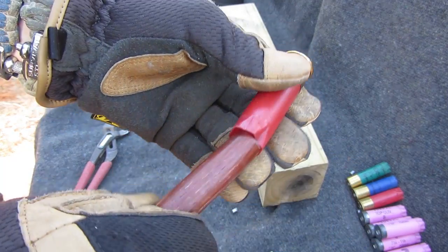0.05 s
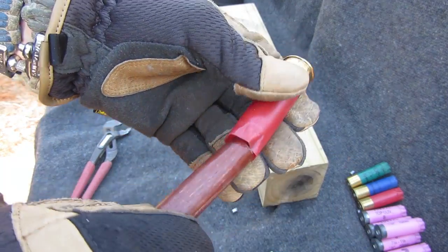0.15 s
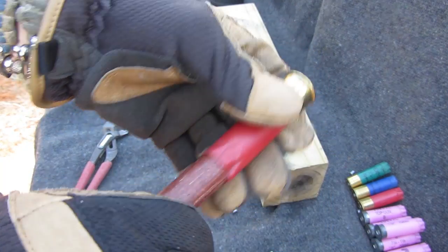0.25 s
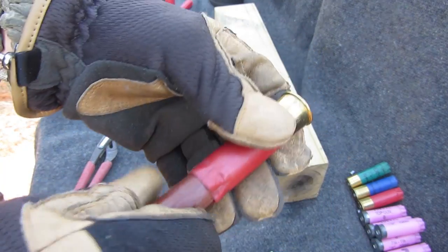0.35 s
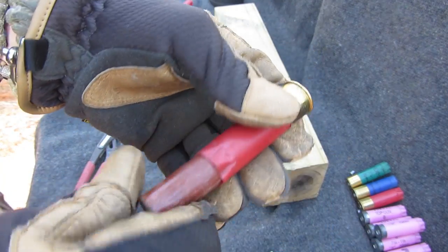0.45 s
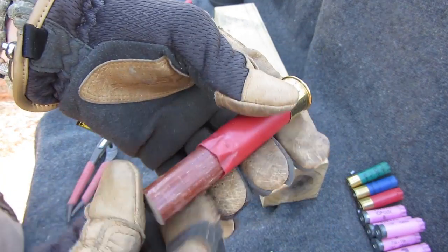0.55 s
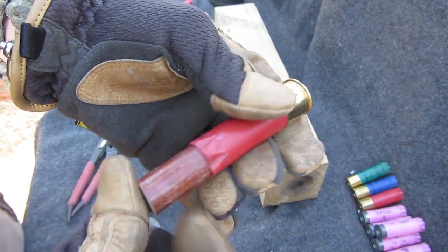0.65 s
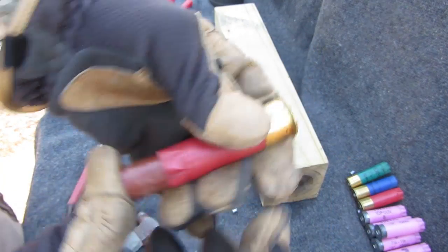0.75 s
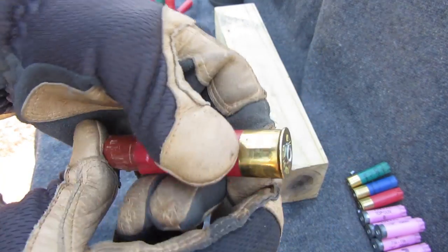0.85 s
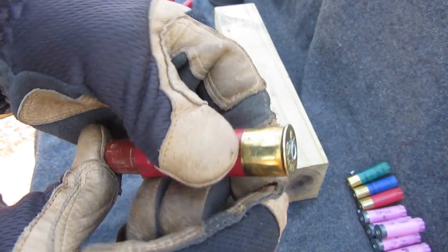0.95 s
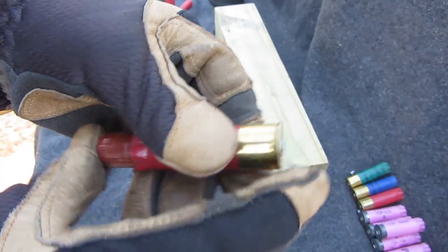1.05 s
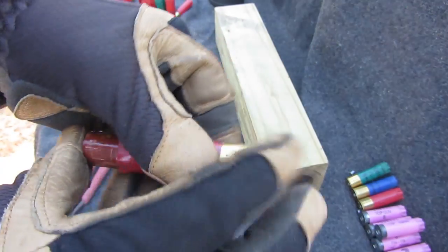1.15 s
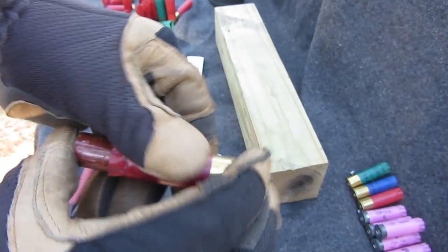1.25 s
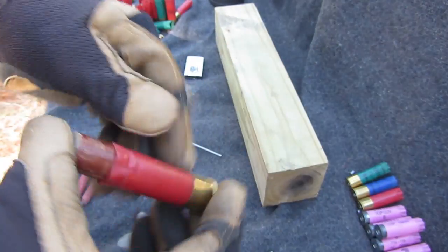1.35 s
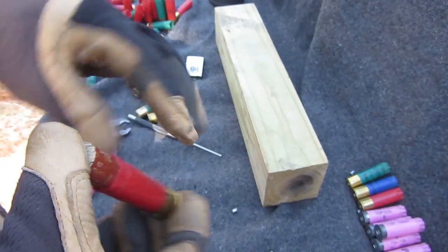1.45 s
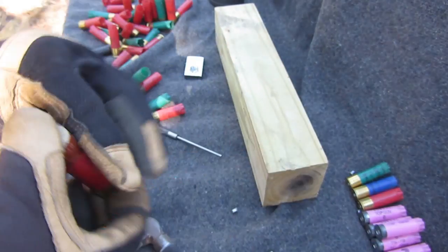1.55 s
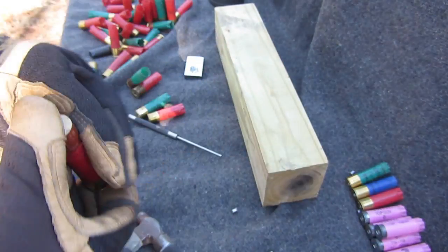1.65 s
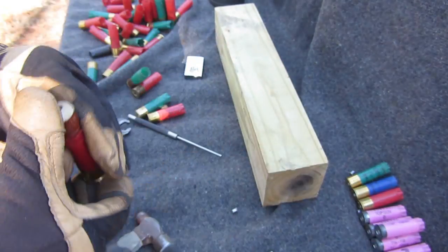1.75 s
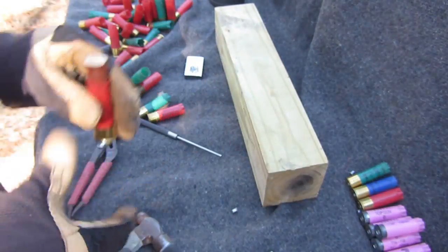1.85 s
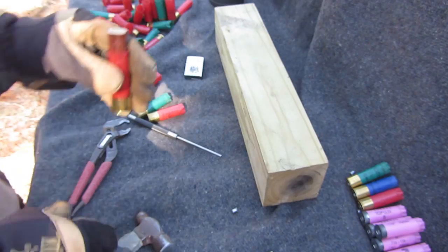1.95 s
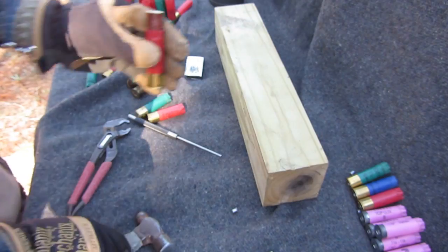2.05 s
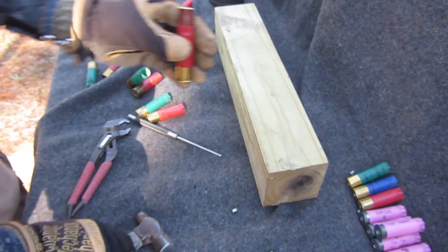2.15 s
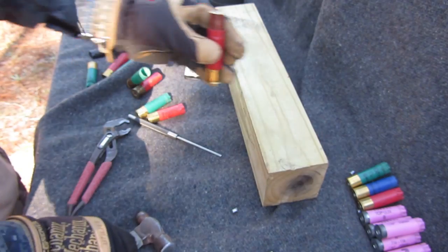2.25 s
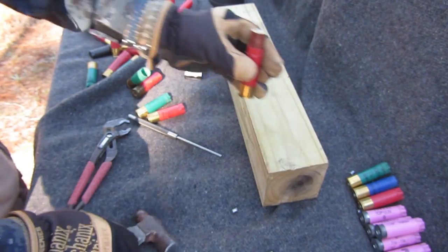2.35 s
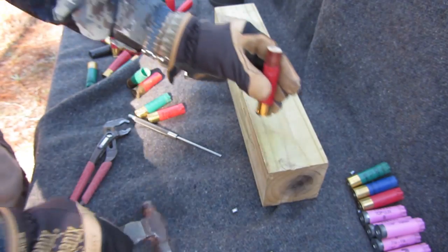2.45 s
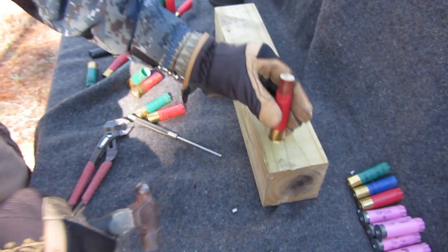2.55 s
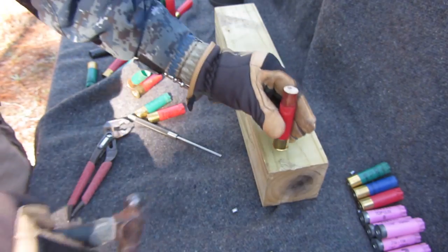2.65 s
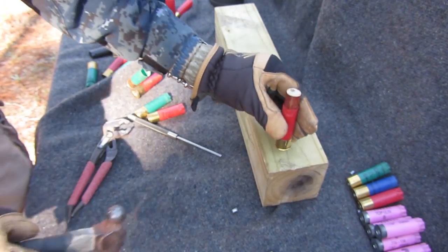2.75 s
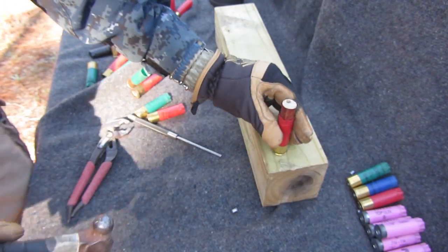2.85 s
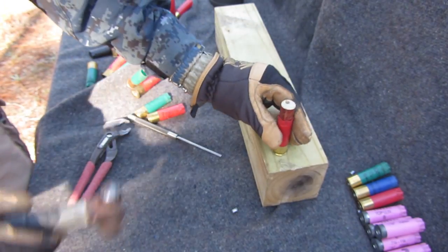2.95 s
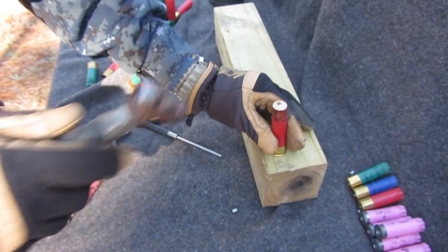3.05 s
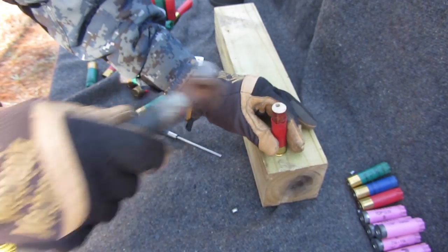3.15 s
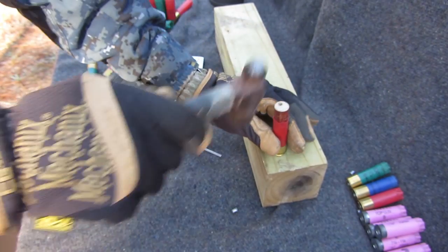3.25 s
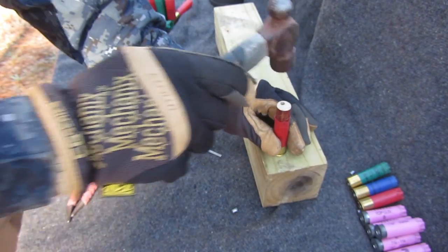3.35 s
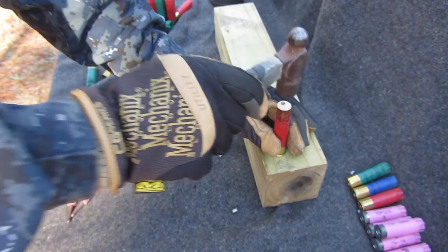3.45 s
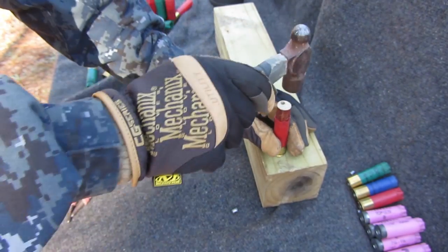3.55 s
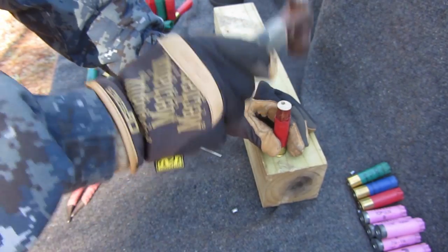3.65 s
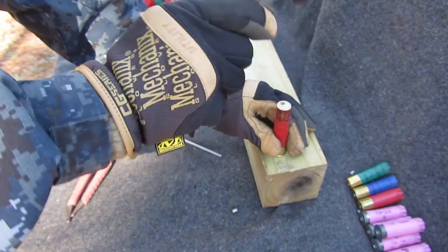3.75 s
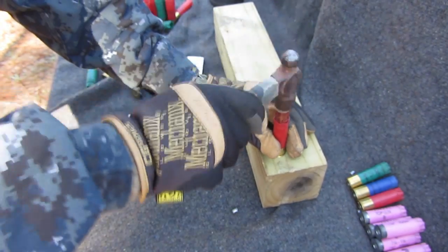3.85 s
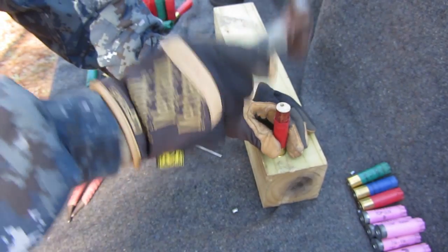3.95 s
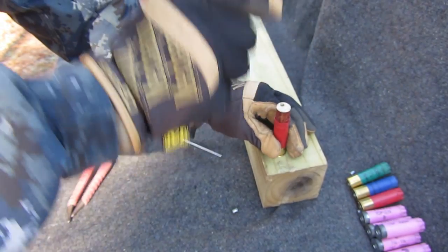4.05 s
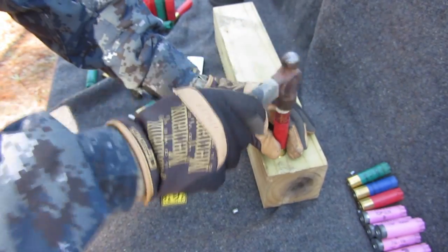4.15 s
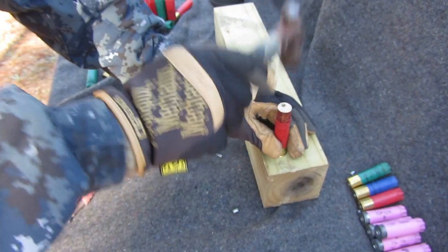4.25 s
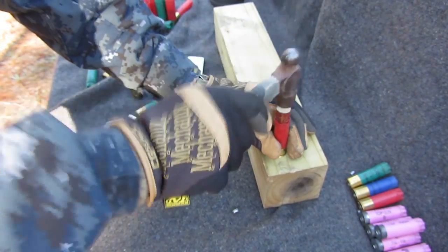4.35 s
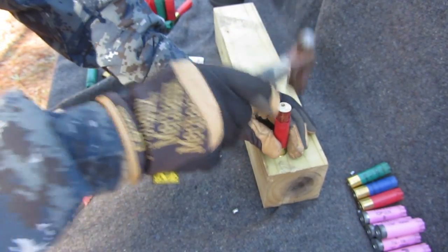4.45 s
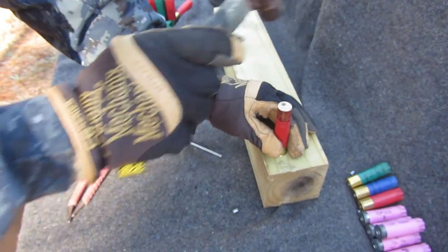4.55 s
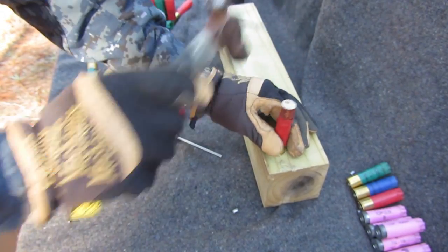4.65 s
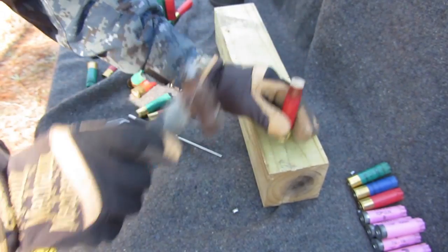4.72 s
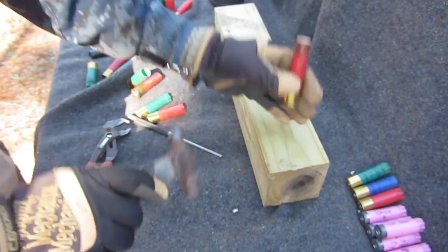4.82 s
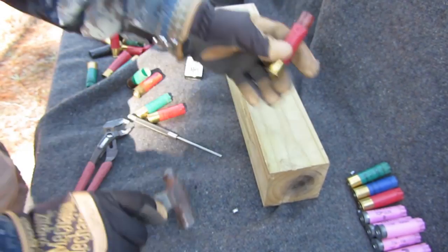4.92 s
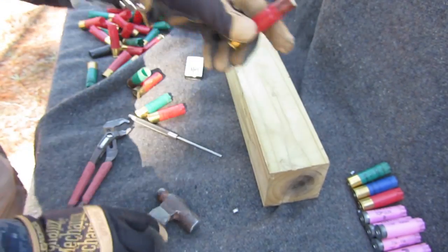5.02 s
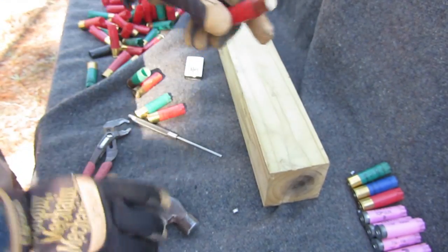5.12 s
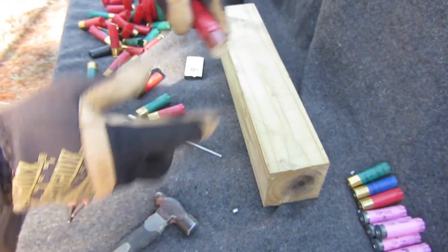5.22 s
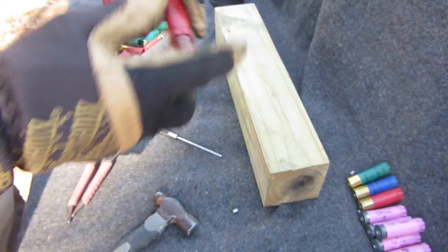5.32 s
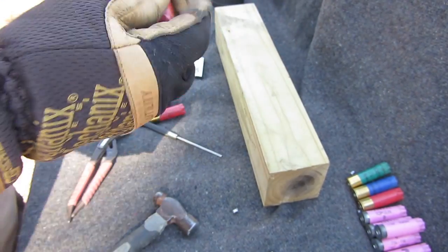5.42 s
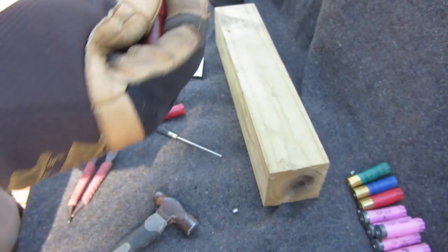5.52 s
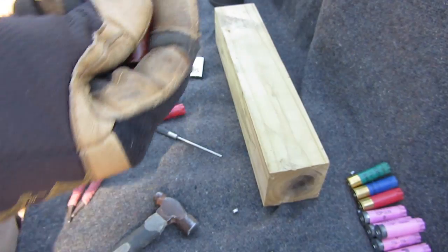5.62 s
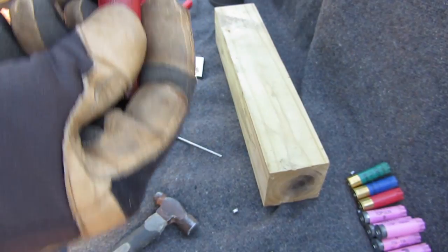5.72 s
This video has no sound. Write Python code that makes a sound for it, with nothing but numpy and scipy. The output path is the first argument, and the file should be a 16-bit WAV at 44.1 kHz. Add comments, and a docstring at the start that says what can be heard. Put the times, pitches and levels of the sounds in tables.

```python
"""Hammering a shell on a wooden block

Outdoors, at a blanket-covered deck, gloved hands work a wooden stick in an empty plastic shotgun shell. It clicks
home with damped air-column modes and pulses, scrapes back as stick-slip noise with a falling tone, and pops out.
The shell is stood on a wooden block and hammered three times: coloured noise cracks, modes ring in block and deck,
the block hops and loose things rattle. The hammer drops on the blanket as softer deck modes and a late rattle.
Gloves and sleeves rustle throughout as filtered noise, over faint outdoor air at the stereo microphone."""
import sys
import numpy as np
from scipy import signal
from scipy.fft import rfft, irfft
from scipy.io import wavfile

SR = 44100
rng = np.random.default_rng(int(sys.argv[2]) if len(sys.argv) > 2 else 0)


def transcribe(signal):
    """Save signal, clipped to [-1, 1], as a 16-bit WAV file at the path in sys.argv[1]."""
    frames = np.atleast_2d(signal).T
    limited = np.clip(frames, -1, 1)
    pcm = np.round(limited * 32767).astype(np.int16)
    wavfile.write(sys.argv[1], SR, pcm)


N = 254898
TIME = np.arange(N) / SR
AGE = TIME[:SR]  # one second after a contact


def undb(db):
    """Decibels to gain."""
    return 10 ** (np.asarray(db) / 20)


def curves(rows):
    """Every column of a timed table, joined by straight lines."""
    s, *columns = np.transpose(rows)
    return [np.interp(TIME, s, column) for column in columns]


def unit(x):
    """Scale to rms 1."""
    return x / np.sqrt(np.mean(x ** 2))


def colour(x, points):
    """Filter by a spectrum of (f/Hz, level/dB) points, joined on a log frequency axis; rms 1."""
    hz, db = np.transpose(points)
    f = np.maximum(np.fft.rfftfreq(x.shape[-1], 1 / SR), 1)
    gain = undb(np.interp(np.log(f), np.log(hz), db))
    return unit(irfft(rfft(x) * gain, x.shape[-1]))


def band(x, lo_hz, hi_hz, order=2):
    """Band-pass."""
    edges = [lo_hz, min(hi_hz, SR / 2 - 1000)]
    return signal.sosfilt(signal.butter(order, edges, "band", fs=SR, output="sos"), x)


def walk(rate):
    """Random curve with a spread near 1, through `rate` random points per second."""
    steps = rng.standard_normal(4096)
    return np.interp(TIME * rate, np.arange(len(steps)), steps)


def fade(t60):
    """Free decay by 60 dB in t60 seconds."""
    return np.exp(-np.log(1000) * AGE / t60)


def ring(modes, contact_s):
    """Modes (f/Hz, level/dB, t60/s) swell during contact and die away; little radiates below the first."""
    modal_sum = sum(undb(db) * np.sin(2 * np.pi * hz * AGE) * fade(t60) for hz, db, t60 in modes)
    struck = modal_sum * (1 - np.exp(-AGE / contact_s))
    return signal.sosfilt(signal.butter(2, 0.89 * modes[0][0], "high", fs=SR, output="sos"), struck)


def burst(points, t60):
    """A short crack of coloured noise."""
    return colour(rng.standard_normal(SR), points) * fade(t60)


def snap(s, points):
    """A single pressure pulse at time s with a spectrum of (f/Hz, level/dB) points; peak 1."""
    pulse = colour(signal.unit_impulse(N, int(s * SR)), points)
    return pulse / np.abs(pulse).max()


def spread(pair, width):
    """Two unrelated signals as mid and side."""
    return (pair[0] + width * np.array([[1], [-1]]) * pair[1]) / np.hypot(1, width)


def place(x, pan_db, lag=0):
    """Stereo place: level difference (left minus right) and the samples by which the left side lags."""
    left, right = np.broadcast_to(x, (2, N))
    delayed_left = np.interp(np.arange(N) - lag, np.arange(N), left)
    return np.array([delayed_left * undb(pan_db / 2), right * undb(-pan_db / 2)])


def add(track, s, x):
    """Mix a sound in at time s."""
    i = max(int(s * SR), 0)
    track[..., i:i + x.shape[-1]] += x[..., :N - i]


# spectrum of the open air around the deck: (f/Hz, level/dB)
AIR_SPECTRUM = [(25, -24), (50, -9.5), (80, 0), (130, -0.5), (250, -4.5), (500, -6.5), (900, -10.5),
                (1600, -19), (4000, -26.5), (16000, -54)]
# background level, lower after the loud clicks and blows; gloves follow it too: (t/s, level/dB)
BACKGROUND_LEVEL = [(0, -49.5), (.2, -54.5), (.42, -61), (1, -56), (2.1, -49.5), (3.5, -46), (3.88, -48.5),
                    (3.98, -66.5), (4.9, -65.5), (5.78, -63.5)]


def air(buffet_db=-17):
    """A soft, wavering outdoor rush; a light breeze buffets each microphone port separately."""
    level_db, = curves(BACKGROUND_LEVEL)
    rush = colour(spread(rng.standard_normal((2, N)), width=1.0), AIR_SPECTRUM)
    rumble = unit(band(rng.standard_normal((2, N)), 35, 90))
    buffet = undb(buffet_db + 3 * walk(rate=5)) * rumble
    return place((rush + buffet) * undb(level_db + 1.3 * walk(rate=14)), pan_db=0, lag=-5.5)


def swell(s, length):
    """Speed of a hand that starts from rest, is fastest at time s and stops again."""
    rise = 0.49  # part of the stroke spent speeding up
    phase = np.interp(TIME, [s - rise * length, s, s + (1 - rise) * length], [0, 1, 0])
    return np.sin(np.pi / 2 * phase)


# leather rubbing, then cloth swishing: (f/Hz, level/dB)
LEATHER_SPECTRUM = [(400, -18), (900, -5), (1500, -0.5), (3000, -3.5), (4200, -14), (7000, -23.5)]
CLOTH_SPECTRUM = [(2000, -10.5), (4000, -1), (6000, 3), (9000, -1), (11000, -7), (13000, -16.5),
                  (16000, -25.5)]
# hand moves: (t/s at the fastest, length/s, leather level/dB, cloth level/dB)
HAND_STROKES = [(.01, .16, -63, -57), (.33, 0.33, -65, -62.5), (0.6, 0.11, -55.5, -59.5),
                (0.761, 0.13, -51.5, -57), (0.868, .16, -58, -52), (1.062, 0.067, -56, -56.5),
                (1.153, 0.16, -54.5, -60), (1.41, 0.29, -56, -58.5), (2.103, 0.58, -54, -58),
                (2.496, 0.39, -53, -52.5), (3.047, 0.055, -43.5, -49), (3.255, 0.33, -48.5, -51),
                (3.51, 0.33, -53, -55.5), (3.893, 0.076, -50.5, -51), (4.863, .15, -65.5, -73.5),
                (5.239, .22, -83, -73), (5.538, .18, -68, -69.5)]


def gloves(grip_rub_db=-11.5, grip_swish_db=-12, grain_db=1.5, flutter_db=2.0):
    """Leather rubs and cloth swishes with each stroke and faintly in between, fibres catching unevenly."""
    background_db, = curves(BACKGROUND_LEVEL)
    # faint rustle between strokes, relative to the background
    power = undb([background_db + grip_rub_db, background_db + grip_swish_db]) ** 2
    for s, length, rub_db, swish_db in HAND_STROKES:
        stroke = np.outer(undb([rub_db, swish_db]), swell(s, length))
        power = power + stroke ** 2
    out = 0
    for points, gain in zip((LEATHER_SPECTRUM, CLOTH_SPECTRUM), np.sqrt(power)):
        fibres = spread(rng.standard_normal((2, N)), width=0.79) * undb(grain_db * walk(rate=450))
        out = out + colour(fibres, points) * gain * undb(flutter_db * walk(rate=52))
    return place(out, pan_db=0.5, lag=-1)


# small taps, a catch of the sliding stick, low bumps of the microphone: (t/s, level/dB, centre f/Hz, t60/s)
TAPS_AND_BUMPS = [(.074, -55, 10000, 0.014), (.104, -39, 8700, 0.0046), (.281, -42, 800, .03),
                  (0.572, -42.5, 108, 0.061), (1.495, -46.5, 1690, .04), (2.045, -39, 450, 0.039),
                  (2.305, -56, 12000, .03), (2.998, -46.5, 1900, .03), (3.105, -45, 70, 0.29),
                  (3.16, -43, 1200, 0.028), (3.243, -43.5, 70, .15), (3.594, -34.5, 550, 0.027),
                  (4.722, -63, 2200, 0.04), (5.018, -59.5, 8000, 0.016), (5.451, -52, 90, 0.32),
                  (5.748, -53.5, 5970, 0.021)]


def taps_and_bumps():
    """Small taps, a catch of the sliding stick and low microphone bumps: decaying noise 1.4 octaves wide."""
    out = np.zeros(N)
    for s, db, hz, t60 in TAPS_AND_BUMPS:
        noise = band(rng.standard_normal(SR), hz / 1.6, hz * 1.6)
        add(out, s, undb(db) * unit(noise) * fade(t60))
    return place(out, pan_db=-1)


def held(s, length, attack_s=0.0052, release_s=0.009):
    """A scrape's envelope: attack, hold, release."""
    attack = np.clip((TIME - s) / attack_s, 0, 1)
    return attack * np.exp(-np.maximum(TIME - s - length, 0) / release_s)


# stick sliding out, lightly and then binding: (start t/s, length/s, level/dB)
STICK_SCRAPES = [(0.24, 0.082, -49), (0.323, 0.038, -41.5)]


def slide(slip_db=5.0, waver=.03, tremble_db=4.5, short_hz=1150, long_hz=580, pull_s=.054,
          tone_db=-49, tone_fade_db_per_s=199):
    """Wood sticks and slips on plastic; the air column lengthens and its tone falls and dies away."""
    slips = rng.standard_normal(N) * undb(slip_db * walk(rate=600))
    scrape = colour(slips, [(600, -32), (1300, -11), (1900, 3.0), (3000, -1), (4500, -9.0),
                            (7000, -8.5), (11000, -15.5), (16000, -24)])
    pressure = sum(undb(db) * held(s, length) for s, length, db in STICK_SCRAPES)
    start = STICK_SCRAPES[0][0]
    age = np.maximum(TIME - start, 0)
    # the fall in pitch eases off as the stick slows
    hz = long_hz + (short_hz - long_hz) * np.exp(-age / pull_s)
    phase = 2 * np.pi * np.cumsum(hz * (1 + waver * walk(rate=270))) / SR
    tone = np.sin(phase) * undb(tremble_db * walk(rate=260))
    tone_gain = (TIME > start) * undb(tone_db - tone_fade_db_per_s * age)
    return place(scrape * pressure + tone * tone_gain, pan_db=-2, lag=1.0)


# stick ticking in the shell: (t/s, level/dB, air column f/Hz, relative tick level/dB, tick centre f/Hz)
STICK_CLICKS = [(.0443, -15, 1050, 7, 2300), (.178, -40, 1100, 0, 3000), (.2166, -15, 1080, 8, 4300)]
# air column closed at one end, near odd multiples: (frequency multiple, level/dB, t60/s)
AIR_COLUMN = [(1, -1, .033), (3.32, -1, .019), (5.7, -12, .012), (8.45, -9, .009)]
# plastic crackle after each tick: (f/Hz, level/dB)
CRACKLE_SPECTRUM = [(400, -45), (1200, -15), (1900, 1), (3000, -14), (4500, -4), (7000, -3.5), (9500, -9.5),
                    (12000, -14.5), (16000, -42.5)]
# stick snapping off the rim: (f/Hz, level/dB)
POP_SPECTRUM = [(150, -47.5), (500, -20), (900, -13), (1500, -10), (2000, -2.5), (3100, -1), (3700, -15),
                (4500, -36.5), (7500, -35.5), (16000, -57)]
# brass base set down on the block: (f/Hz, level/dB, t60/s)
BASE_MODES = [(840, -18.5, 0.0088), (1090, -17, 0.0083), (1496, -27.5, 0.056), (1860, -38, 0.016),
              (3600, -29, 0.0051)]


def shell(seat_db=2, crackle_db=-3, seat_delay_s=.0004, pop_s=.7926, pop_db=-4,
          open_hz=530, open_db=-26, rim_db=-31, stand_s=2.9035):
    """The stick ticks against the shell and rings the air inside; it pops out and the shell is stood up."""
    out = np.zeros(N)
    for s, db, hz, tick_db, tick_hz in STICK_CLICKS:
        column_modes = [(hz * multiple, mode_db, t60) for multiple, mode_db, t60 in AIR_COLUMN]
        column = ring(column_modes, contact_s=0.00016)
        crackle = undb(crackle_db) * burst(CRACKLE_SPECTRUM, t60=0.015)
        add(out, s, undb(db) * (column + crackle))
        hump = [(tick_hz / 20, -80), (tick_hz / 6, -45), (tick_hz / 1.8, -13), (tick_hz, 0),
                (tick_hz * 1.5, -13), (16000, -36)]
        out += undb(db + tick_db + seat_db) * snap(s + seat_delay_s, hump)
    out += undb(pop_db) * snap(pop_s, POP_SPECTRUM)
    # the tip rasps over the rim just before the pop
    add(out, pop_s - .004, undb(rim_db) * burst(CRACKLE_SPECTRUM, t60=0.019))
    # the emptied shell rings lower
    open_modes = [(0.8 * open_hz, open_db - 7.5, .015), (open_hz, open_db, .014)]
    add(out, pop_s, ring(open_modes, contact_s=.0003))
    add(out, stand_s, ring(BASE_MODES, contact_s=0.00054))
    return place(out, pan_db=-3.5, lag=0.99)


# loose things shaken on the deck: (f/Hz, level/dB, t60/s)
LOOSE_THINGS = [(50, -39, 0.55), (115, -25.5, .7), (154.5, -17.5, 2.5), (200, -1.5, 0.84), (310, 2, 0.71),
                (434, -5, 0.5), (690, -3.5, 0.37), (1460, -9.5, 0.29), (2200, -15.5, 0.29),
                (3150, -19, 0.23), (4504, -28.5, 0.2), (8100, -30, 0.14), (12000, -46.5, .13),
                (16000, -58.5, .1)]


def rattle(swell_s, width, grain_db=3, ringing_db=3.0):
    """Shells and tools jostle on the shaken deck: a dense chatter whose treble dies first."""
    hz, _, t60 = np.transpose(LOOSE_THINGS)
    contacts = spread(rng.standard_normal((2, SR)), width) * undb(grain_db * walk(rate=430)[:SR])
    log_f = np.log(np.maximum(np.fft.rfftfreq(SR, 1 / SR), 1))
    # the many small bodies each favour their own narrow bands
    body_hz = np.geomspace(400, 16000, 140)
    body_db = ringing_db * np.interp(log_f, np.log(body_hz), rng.standard_normal(len(body_hz)), left=0)
    spectrum = rfft(colour(contacts, [row[:2] for row in LOOSE_THINGS])) * undb(body_db)
    out = 0
    # overlapping bands, each with its own decay
    for share, band_t60 in zip(np.eye(len(hz)), t60):
        band_gain = np.interp(log_f, np.log(hz), share)
        out = out + irfft(spectrum * band_gain, SR) * fade(band_t60)
    return out * (1 - np.exp(-AGE / swell_s))


# deck panel: (f/Hz, level/dB struck under the block, level/dB struck under the hammer, t60/s)
DECK_MODES = [(94.4, -37, -43, 0.45), (138, -48, -35, 0.39), (168, -11, -21.5, 0.34),
              (196.4, -18, -19.5, 0.25), (217.7, -8.5, -7, 0.087), (253.3, -13, -31.5, 0.18),
              (279.7, -29.5, -30.5, .55), (297, -16, -15, 0.16), (344.6, -25, -36.5, 0.39),
              (371.8, -20, -40.5, 0.21), (381.1, -19.5, -38, 0.27), (481, -28.5, -31, .24),
              (583, -43.5, -41.5, 0.42), (664, -38.5, -39, 0.28), (740, -42.5, -43.5, .25),
              (836, -37.5, -44.5, 0.26), (1033, -43, -57.5, 0.37)]
# hammer dropped, head then handle: (t/s, relative thump level/dB, relative rattle level/dB)
HAMMER_DROPS = [(5.0163, 0, -14.5), (5.179, -4, -18.5)]


def drop(rattle_db=-22):
    """The blanket softens the fall: no crack, only the deck and a late rattle."""
    out = np.zeros((2, N))
    deck = ring([(hz, db, t60) for hz, _, db, t60 in DECK_MODES], contact_s=0.0015)
    for s, thump_db, shake_db in HAMMER_DROPS:
        add(out, s, undb(thump_db) * band(deck, 95, 1000))
        soft_rattle = band(rattle(swell_s=0.018, width=.5), 50, 2300, order=1)
        add(out, s, undb(rattle_db + shake_db) * soft_rattle)
    return place(out, pan_db=-3.5)


# hammer blows: (t/s, then relative thump, crack, wood and rattle level/dB)
HAMMER_BLOWS = [(3.9092, -2, -12.5, -7, -4), (4.2008, -0.5, -15.5, -9, 0.5),
                (4.4222, -0.5, -16.5, -6.5, -3)]
# the block on the deck, at the blow and landing again: (delay t/s, relative level/dB)
BLOCK_HOPS = [(0, 0.5), (0.0186, -10), (0.0326, -5)]
# wooden block: (f/Hz, level/dB, t60/s)
BLOCK_MODES = [(663, -12, 0.062), (793, -9.5, .028), (970, -5, 0.019), (1214, -4.5, 0.018),
               (1342, -5.5, 0.0149), (1487, -9.5, 0.03), (1837, -10.5, 0.017), (2478, -14.5, .012),
               (3570, -13.5, 0.012)]
# steel on the shell: (f/Hz, level/dB)
CRACK_SPECTRUM = [(500, -24.5), (1500, 5.5), (2500, -2), (4000, -1.5), (6000, -1), (8000, -5), (9800, -9.5),
                  (11500, -21.5), (16000, -33)]


def hammer(wood_delay_s=0.001697, deck_delay_s=.0027, rattle_db=-22, hop_tick_db=-40, waver_db=2.5):
    """Steel cracks on the shell, the block rings, then the deck booms each time the block lands."""
    strike, boom = np.zeros(N), np.zeros((2, N))
    deck = ring([(hz, db, t60) for hz, db, _, t60 in DECK_MODES], contact_s=0.0016)
    for s, thump_db, crack_db, wood_db, shake_db in HAMMER_BLOWS:
        add(strike, s, undb(crack_db) * burst(CRACK_SPECTRUM, t60=0.015))
        add(strike, s + wood_delay_s, undb(wood_db) * ring(BLOCK_MODES, contact_s=0.00016))
        # the deck's ring wavers in level at random as it fades
        wavering = deck * undb(waver_db * walk(rate=79)[:SR] * (1 - fade(t60=0.23)))
        for delay, db in BLOCK_HOPS:
            add(boom, s + deck_delay_s + delay, undb(thump_db + db) * wavering)
            add(strike, s + delay, undb(hop_tick_db) * burst(CRACK_SPECTRUM, t60=0.026))
        add(boom, s, undb(rattle_db + shake_db) * rattle(swell_s=0.0013, width=.5))
    return place(strike, pan_db=-1.5, lag=1) + place(boom, pan_db=-3.5)


def scene():
    """All sources at the microphone, from the background to the hammer."""
    return air() + gloves() + taps_and_bumps() + slide() + shell() + drop() + hammer()


def record(dry, ceiling=0.73, top_hz=16200):
    """The recorder rounds the loudest peaks and cuts the top."""
    rounded = dry / (1 + (dry / ceiling) ** 4) ** (1 / 4)
    return signal.sosfilt(signal.ellip(8, .2, 70, top_hz, fs=SR, output="sos"), rounded)


dry = scene()
out = record(dry)
transcribe(out)
```